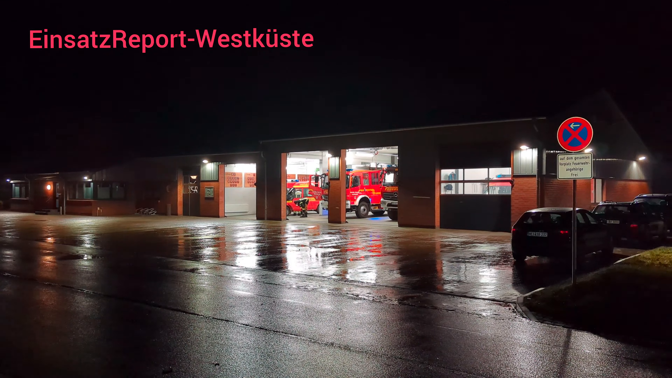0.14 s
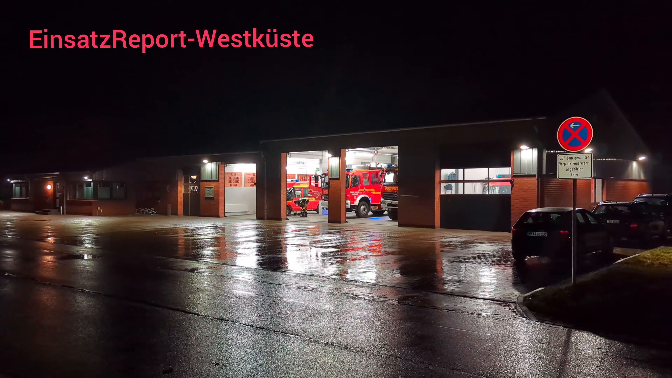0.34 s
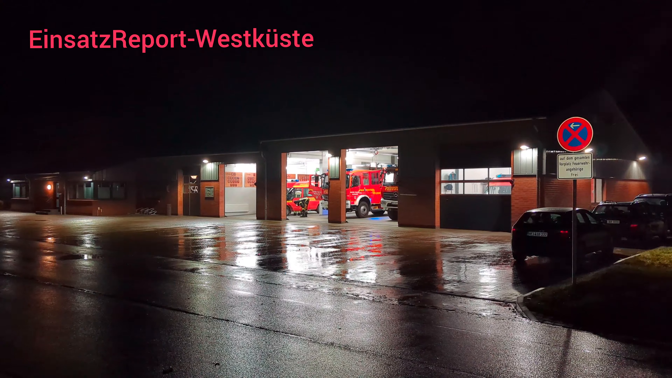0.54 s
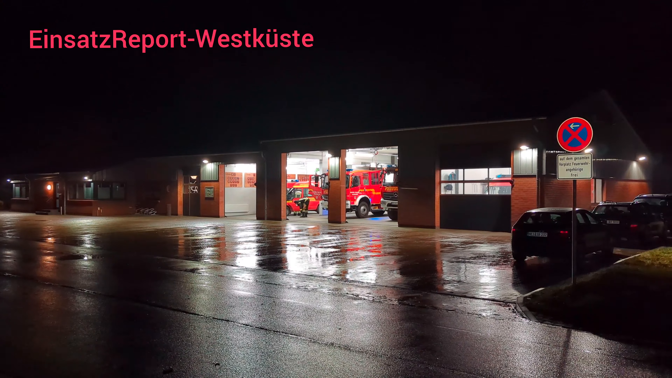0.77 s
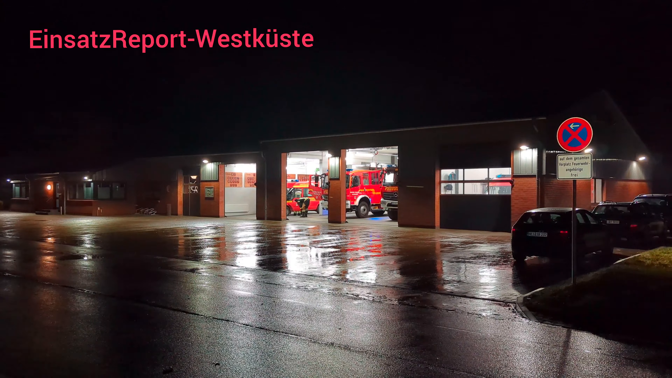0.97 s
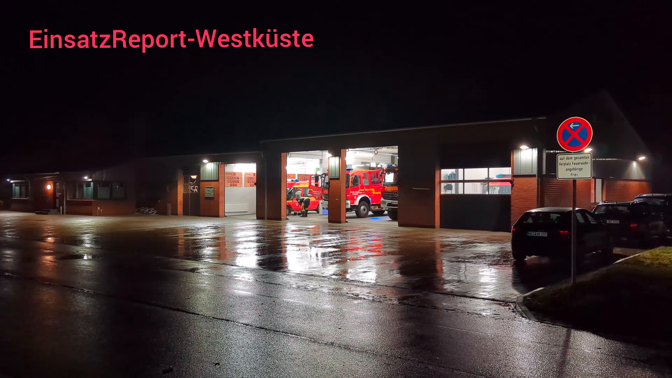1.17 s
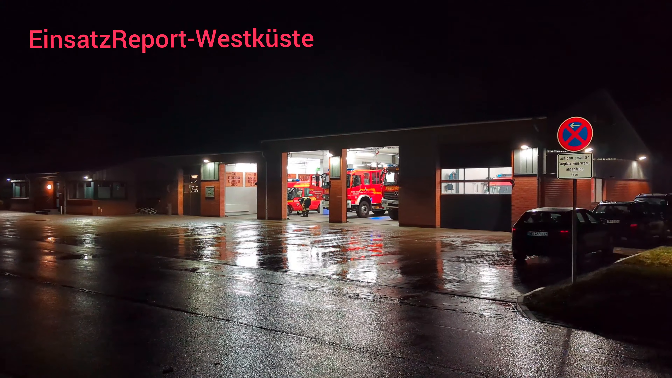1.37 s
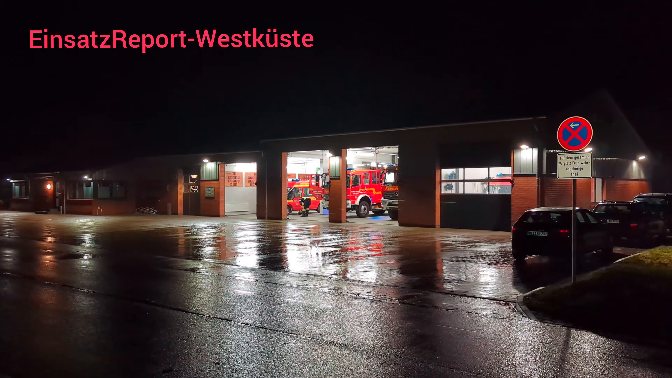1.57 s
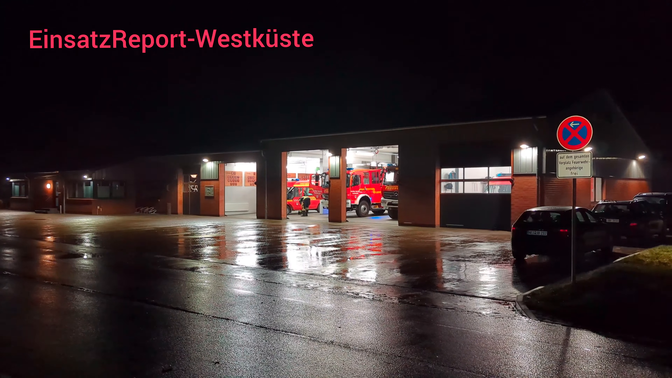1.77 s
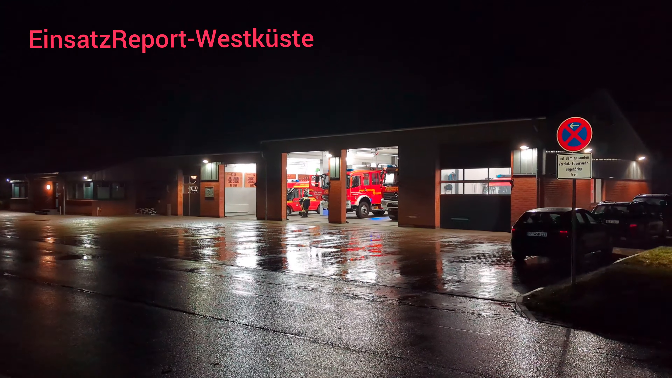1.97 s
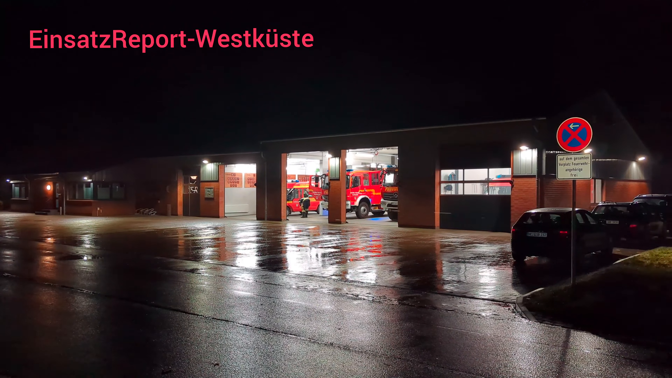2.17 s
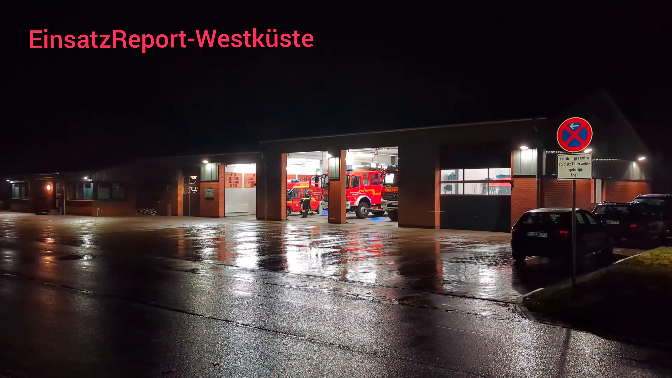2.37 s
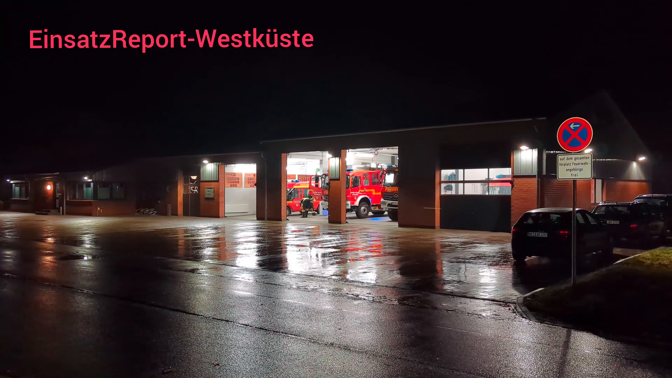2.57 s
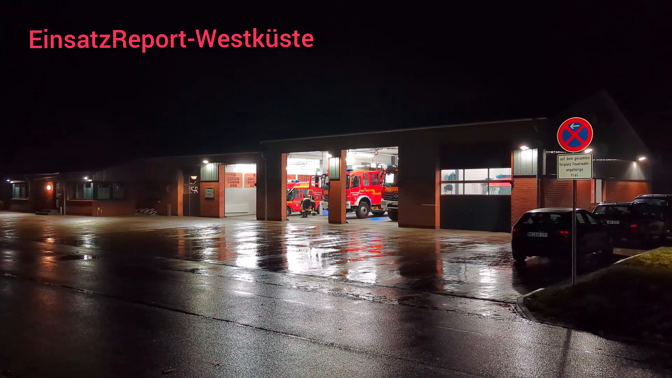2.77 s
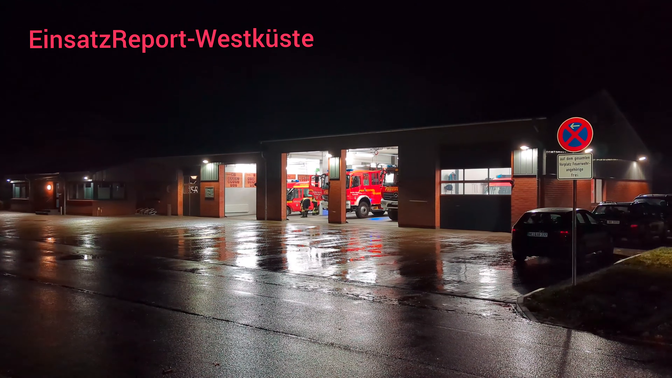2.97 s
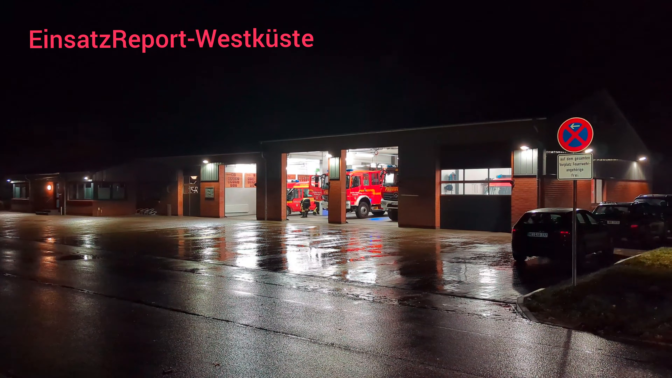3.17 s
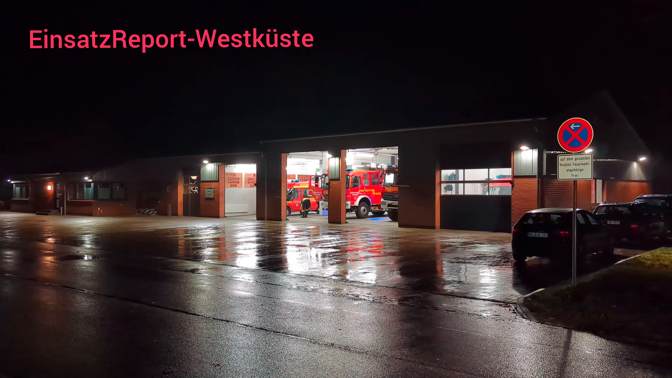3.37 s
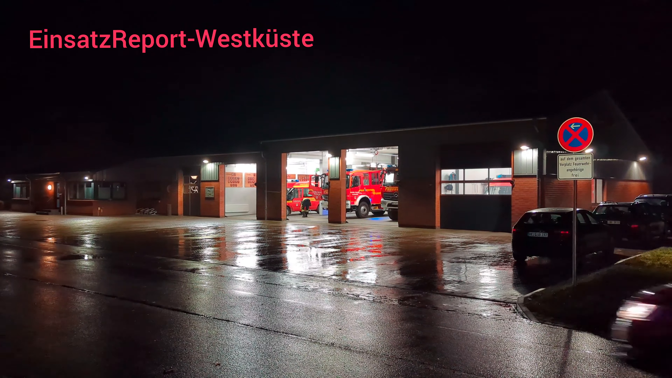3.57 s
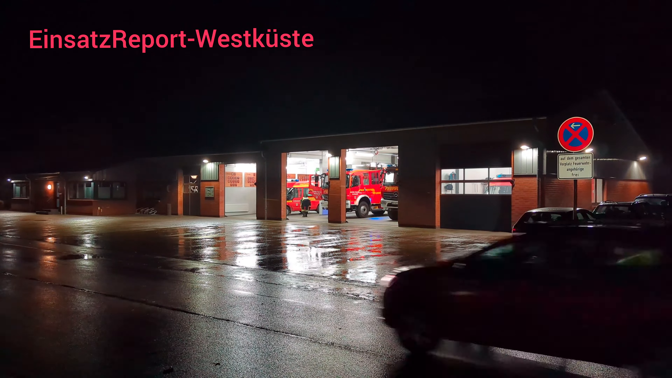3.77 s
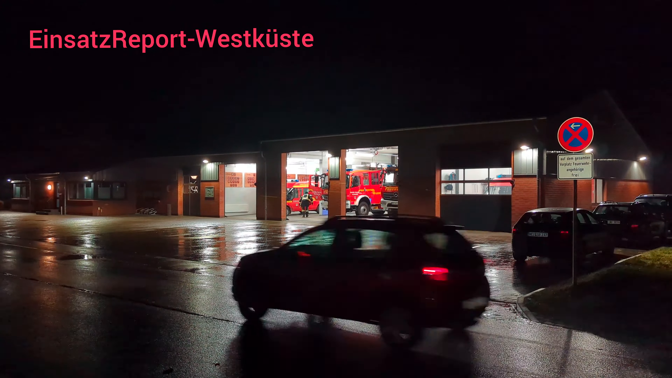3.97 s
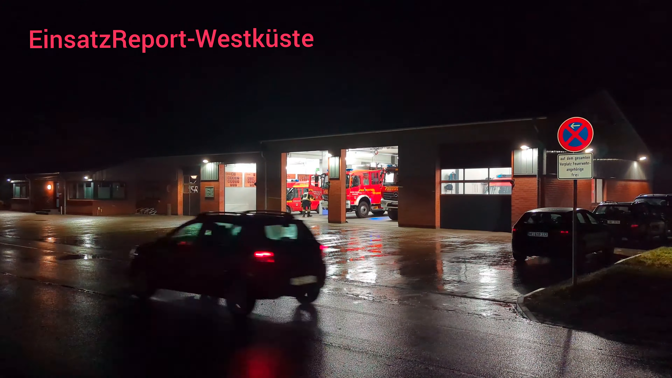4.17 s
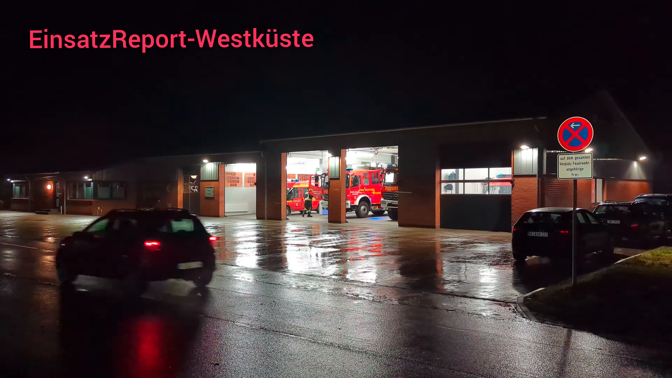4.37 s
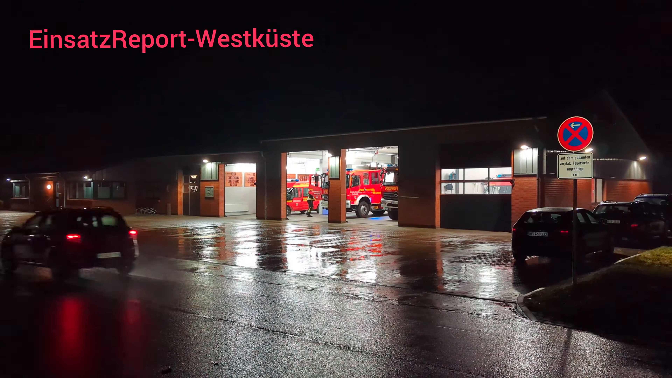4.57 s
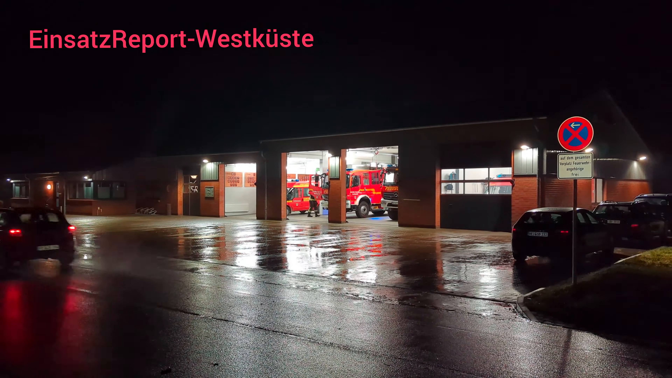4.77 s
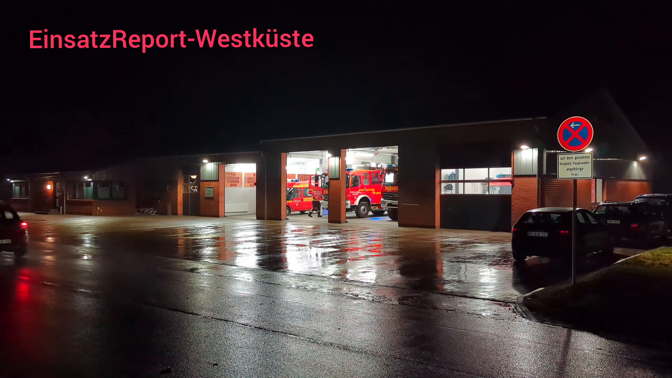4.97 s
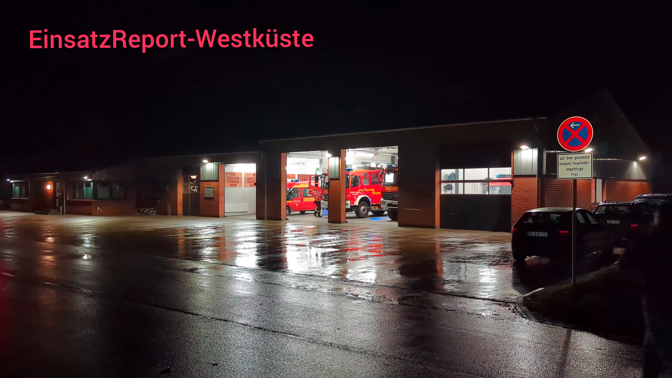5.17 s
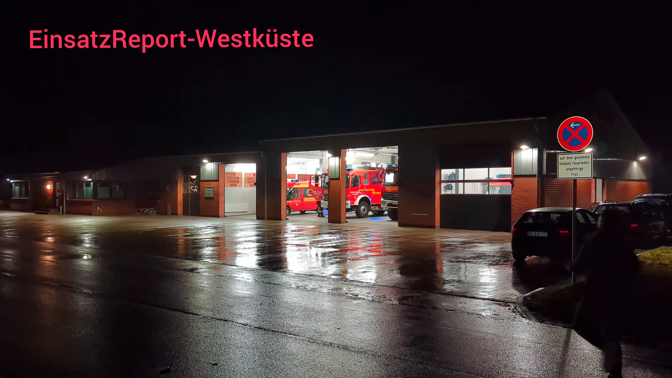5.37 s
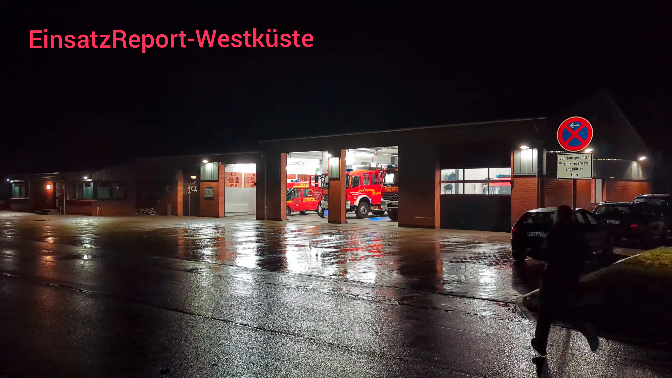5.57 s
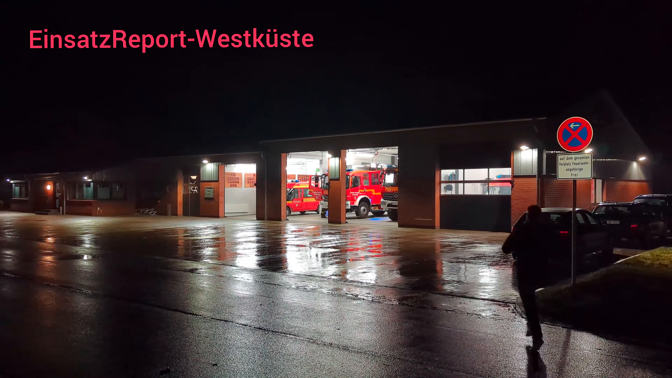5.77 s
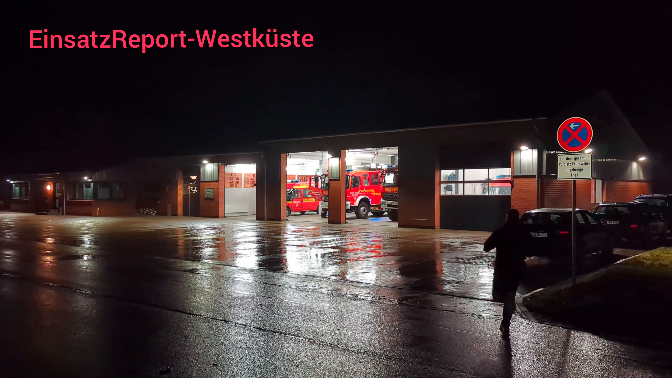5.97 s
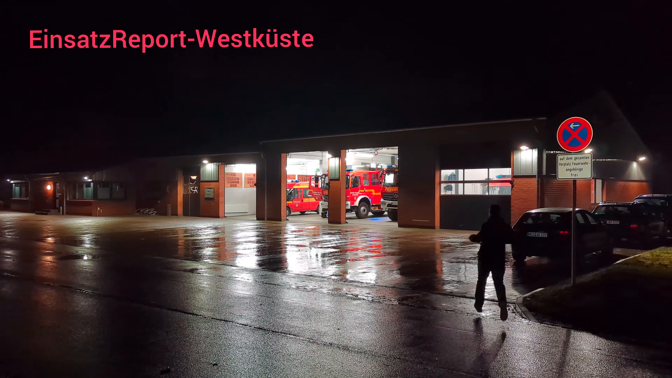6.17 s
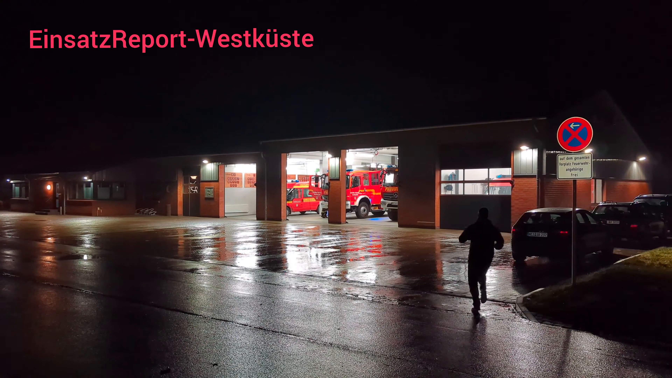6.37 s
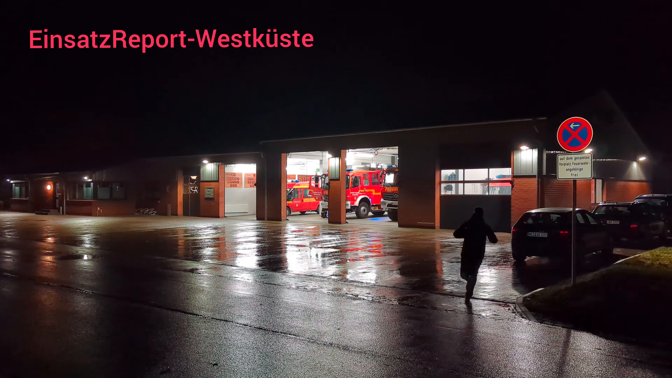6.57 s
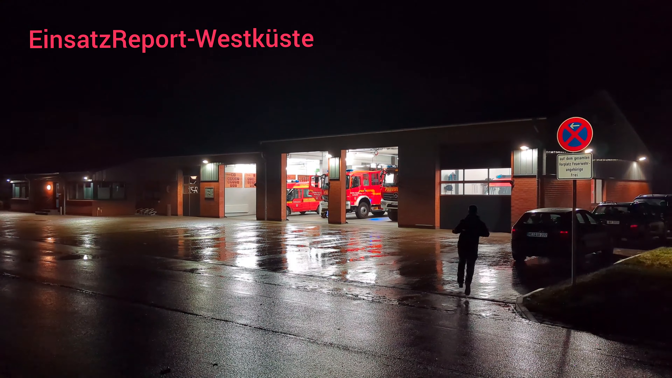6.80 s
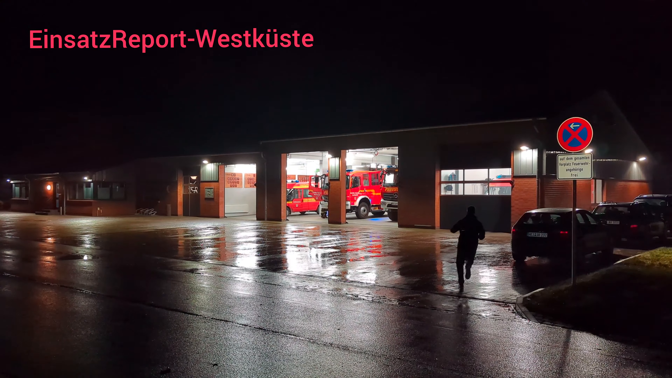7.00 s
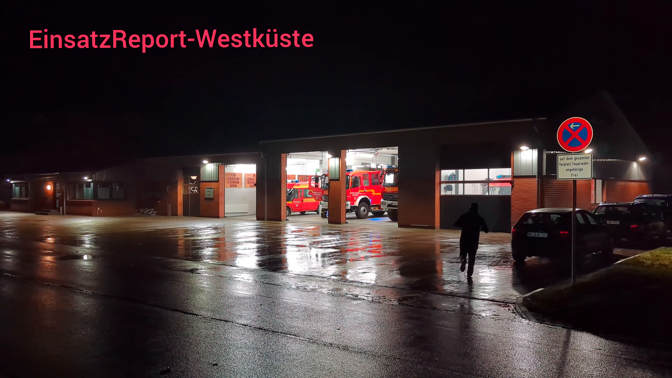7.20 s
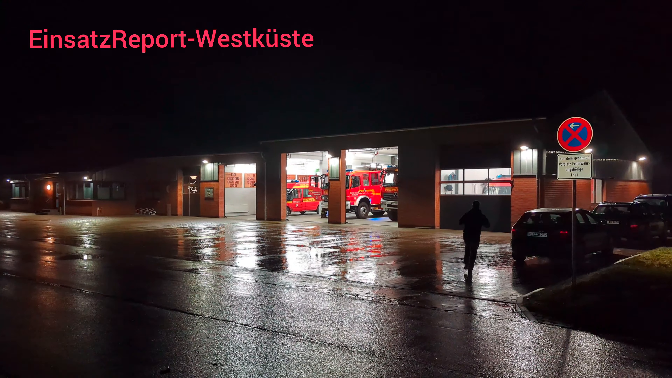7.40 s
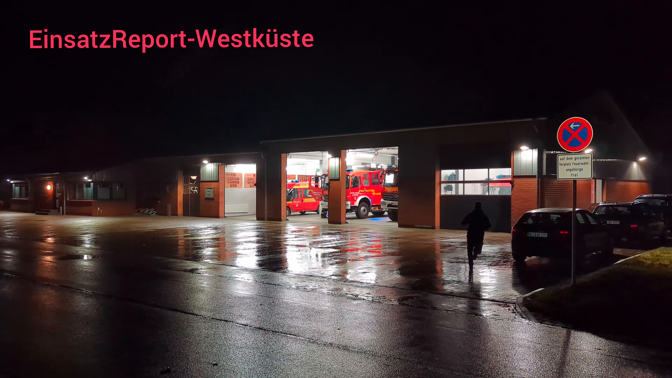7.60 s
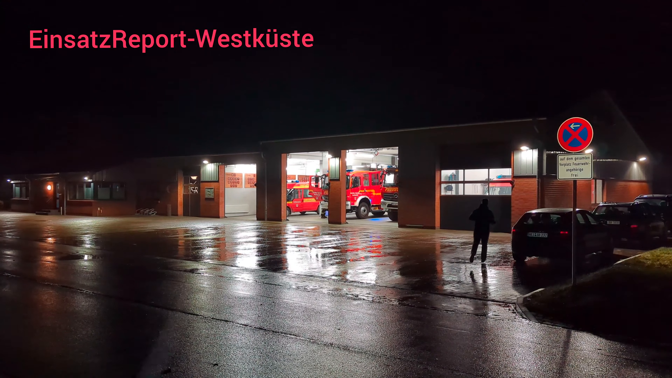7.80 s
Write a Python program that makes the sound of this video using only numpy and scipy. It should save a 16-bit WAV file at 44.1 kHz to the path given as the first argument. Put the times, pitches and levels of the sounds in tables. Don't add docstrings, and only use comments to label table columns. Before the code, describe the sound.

A wet street at night, heard in stereo from the roadside. Very faint drizzle, far traffic and a weak steady building hum form the bed. From 0 s a distant car is a soft watery hiss, with small drip ticks and one barely audible step near 1 s. A puddle briefly brightens the hiss around 1.7 to 1.9 s; it swells steadily, with a sharper tick at 3.1 s and more splashing. At about 3.7 to 4 s the car sweeps close by from right to left: broad bright spray, tyre rumble and a short low exhaust hum around 60 Hz. Spray trails from 4.2 s, slowly thinning and darkening, the engine sinking away by 7 s. Light running steps crunch on wet grit at about 6.35, 6.7, 7.0, 7.3 and 7.65 s, while low wind buffets bump mostly the right microphone, strongest around 7 to 7.2 s.

```python
import sys
import numpy as np
from scipy import signal
from scipy.fft import rfft, irfft, next_fast_len
from scipy.io import wavfile
from scipy.ndimage import map_coordinates

SR = 44100
rng = np.random.default_rng(int(sys.argv[2]) if len(sys.argv) > 2 else 0)


def gain_from_db(level_db):
    decades = np.asarray(level_db, float) / 20
    return 10 ** decades


def to_wav(s):
    ch = np.atleast_2d(s).T
    pcm = np.round(np.clip(ch, -1, 1) * 32767)
    wavfile.write(sys.argv[1], SR, pcm.astype(np.int16))


N = 345920
SIZE = next_fast_len(N, real=True)
HZ = np.maximum(np.fft.rfftfreq(SIZE, 1 / SR), 1)
TIME = np.arange(N) / SR

# [f/Hz, level/dB per Hz]
RUMBLE_COLOUR = [(22, -45), (40, -2), (65, 2), (110, -4), (180, -0.5), (250, 0), (310, -5.5), (370, -13.5),
                 (450, -49)]
ROLL_COLOUR = [(280, -70), (370, -12), (430, -2.5), (500, 1), (590, -2.5), (700, -3), (820, -13), (950, -4),
               (1200, -59)]
HISS_COLOUR = [(600, -15), (820, -8), (1000, -4.5), (1300, -1), (1700, -4), (2000, -6), (2500, -12),
               (3200, -22.5), (4200, -48.5)]
SPRAY_COLOUR = [(1600, -32), (2300, -1.5), (3000, -1), (4000, -4), (5500, -10.5), (7000, -20.5),
                (9500, -42.5)]
MIST_COLOUR = [(4000, -25), (6000, -1), (8000, -2), (10000, -8.5), (12000, -19)]
FINEST_MIST_COLOUR = [(8000, -45), (10500, 3), (12000, 4), (14000, -3.5), (16000, 3)]
# [t/s, level/dB]
FILM = [(0, -1), (.6, -1), (1.2, 0), (1.8, 1), (2.4, .5), (2.9, 1), (3.45, 0.5), (3.85, 0.5), (4.2, 1),
        (4.45, -0.5), (4.65, -2), (5.0, 0), (5.3, 2), (5.7, 0.5), (6.42, 1.5), (6.6, -2), (7.3, -3.5),
        (7.84, -7)]
# [t/s, length/s, extra water level/dB]
PUDDLES = [
    (1.744, 0.13, 8.5),
    (1.877, 0.062, 5),
    (3.05, 0.12, 2),
    (3.326, 0.14, 2.5),
    (4.174, .1, 1),
    (4.317, 0.099, 2.5),
    (6.1, 0.066, 2.5),
    (6.417, 0.076, 2),
]
# [t/s, level/dB]
TYRE_CAVITY = [(0, -51), (1.3, -53), (1.8, -44.5), (2.5, -40), (2.95, -41), (3.3, -46), (3.9, -56),
               (4.4, -39), (5.9, -45), (7.84, -61.5)]
# [t/s, f/Hz, level/dB]
ROAD_HUMP = [(0, 430, -73.5), (2.6, 430, -52), (3.0, 390, -39.5), (3.3, 330, -43.5), (3.6, 270, -33.5),
             (3.9, 230, -36), (4.2, 215, -38), (4.6, 210, -47.5), (7.84, 210, -55.5)]
# [t/s, level/dB]
EXHAUST = [(0, -50), (1.05, -52.5), (1.65, -49), (2.36, -45), (2.67, -59), (2.86, -40.5), (3.3, -37.5),
           (3.65, -32.5), (3.86, -22.5), (4.11, -23.5), (4.33, -31.5), (5.0, -37), (5.13, -46), (5.45, -38),
           (5.65, -45), (5.8, -40.5), (6.5, -48), (7.0, -40)]
# [t/s, level/dB]
SECOND_ORDER = [(0, -65), (2.9, -56), (3.2, -44), (3.47, -36.5), (3.62, -42.5), (3.86, -32), (4.15, -43),
                (4.6, -49), (7.0, -57)]
# [f/Hz, level/dB]
SCATTER = [(60, -26), (300, -15), (1000, -12), (2500, -5.5), (4500, -2), (7000, 1), (11000, 6), (16000, 8)]
# [bearing/deg, left echo 0-1, right echo 0-1,
# treble left-right level/dB, scattered level/dB]
HOUSING = [(-84, 0.36, .04, 8, 5), (-79, 0.15, 0.02, -1.5, -2.5), (-56, 0.02, .02, -6.5, -2.5),
           (-43, 0.2, 0, -6, 0.5), (-10, 0.4, 0.6, -5, 4.5), (13, 0.77, 0.65, -1, 5.5),
           (55, 0.27, 0.34, 1.5, 4), (69.5, 0.13, 0.9, 9.5, 3), (73.5, 0.26, 0.4, 1.8, 2.1),
           (81.5, 0, 0.54, 4, 3.5)]
# [f/Hz, level/dB]
LEFT_ECHO = [(500, -20), (1500, -21), (2500, 2), (6000, 4.5), (9000, -28), (16000, -14)]
RIGHT_ECHO = [(500, -14), (1500, -16), (2500, 0.5), (6000, -8), (10000, 5), (16000, -27)]
# [t/s, peak level/dB, left-right level/dB]
STEPS = [
    (0.9994, -53, 0.5),
    (6.3494, -42, -2),
    (6.678, -46, 0.5),
    (6.9815, -47.5, 0.5),
    (6.999, -41, 0.5),
    (7.32, -42, 0.0),
    (7.335, -50, 10.5),
    (7.65, -45, 0.5),
    (7.658, -43, 2),
]
# [t/s, peak
# level/dB, left-right level/dB]
TICKS = [(0.3094, -48, 3.5), (0.3267, -40, 5), (0.331, -40, 3), (0.5222, -48, -2.0), (0.6569, -44, 2.0),
         (1.3179, -40, 3.0), (1.4994, -41, -1.0), (3.069, -26, -6), (6.4494, -48, 0.5), (6.643, -46, 4.5),
         (6.704, -46, 1.5), (6.761, -40, 0.5), (7.405, -49, 0.5), (7.7244, -47, -5)]
# [f/Hz, level/dB per Hz]
GRIT_COLOUR = [(2000, -25), (4500, 4), (7000, -2), (9500, -2), (11500, -4), (13000, -6), (16000, -9)]
# [t/s, half length/s, level/dB, port 0 left 1 right]
GUSTS = [(0.965, 0.074, -49, 0), (1.38, .05, -58, 0), (1.72, 0.088, -43, 0), (2.051, 0.088, -56, 0),
         (2.622, 0.073, -49, 0), (3.42, .1, -39.5, 0), (4.093, 0.094, -32, 0), (5.224, 0.071, -35, 1),
         (5.38, 0.057, -46, 0), (6.21, 0.044, -34, 1), (6.347, 0.038, -39, 1), (6.548, 0.055, -51, 1),
         (6.907, 0.13, -33.5, 1), (6.998, 0.027, -24.5, 1), (7.06, 0.022, -32, 1), (6.947, 0.033, -37, 1),
         (7.13, 0.034, -31, 1), (7.2, 0.034, -24.5, 1), (7.298, 0.075, -40, 1), (7.38, 0.12, -38, 0),
         (7.617, 0.049, -42.5, 1), (7.749, 0.027, -31.5, 1)]
# [f/Hz, level/dB per Hz]
WIND_COLOUR = [(22, -45), (40, 9.5), (65, 9), (110, 1), (180, -7), (300, -50.5)]
DRIZZLE_COLOUR = [(2500, -25), (5000, -1), (8000, 2), (11000, -9), (16000, -14)]
TOWN_COLOUR = [(200, -30), (450, 4), (800, -1), (1500, -6), (2500, -29.5)]

# (level/dB when closest, share of the spreading loss, extra dB sideways,
# extra dB to the rear, share of the film)
ROLL, HISS = (-35.5, 0.8, 2.5, -0.06, 0.17), (-27, 0.9878, -5, -0.1, 0.97)
SPRAY, MIST = (-33, 1.09, -3, 1.87, 1.07), (-41, 1.58, -5, 1.5, 1.93)
BODY = (-36.5, 0.76, -1.5, -0.9, -0.3)
TREAD_REAR, TREAD_REAR_HZ = (-38, 1.01, -16, 11, 1.8), 2111
TREAD_FRONT, TREAD_FRONT_HZ = (-43.5, 1.3, 5, -7.5, 1), 720

SPEED_OVER_GAP = 2.0
FRONT_LEVEL_S, MIST_LEVEL_S, WHEELS_LEVEL_S = 3.76, 3.73, 3.88
SPRAY_LEVEL_S, SPRAY_SWEEP = 3.7, .83
PUDDLE_EDGE_S = 0.051
FINEST_REAR_DB = -3.5
CAVITY_HZ = 239.3
FIRING_HZ, DOPPLER_HZ, SAG_FROM_S, SAG_HZ_PER_S = 61.16, 0.302, 6.15, 21.2
PAIR_TURN_DEG, PAIR_MS, PAN_DB = 32, .5, 1.1
SHORT_WAY_MS = .6
BEND_HZ, OVER_HZ = 2450, 4500
CREEP_MS, CREEP_FROM_DEG, CREEP_TO_DEG, BASS_CREEP = .285, 62, 74, .05
ECHO_TURNS = .05, .19
# (ahead/ms, change per ms of lag, least/ms, most/ms)
LEFT_ECHO_MS, RIGHT_ECHO_MS = (.41, .28, .28, .455), (.31, -.25, .26, .38)
STEP_DECAY_S, TICK_DECAY_S = 0.011, .0025
STATION_HZ, STATION_DB = 295.5, -54.5
DRIZZLE_DB, TOWN_DB = -67, -65.5
BASS_CUT_HZ, TOP_CUT_HZ = 38, 15950


def tyres():
    roll_db, hiss_db, spray_db = [heard_db(source) for source in (ROLL, HISS, SPRAY)]
    splash_db = splashes()
    spray_db = spray_db + 0.6 * splash_db
    mist_db = heard_db(MIST, MIST_LEVEL_S) + splash_db
    film = 0.56 * drift(4.0) + 0.56 * drift(33)
    finest_db = mist_db - 3 + .35 * (mist_db + 40)
    finest_db = finest_db + FINEST_REAR_DB * np.sin(bearing(MIST_LEVEL_S)) + 4.0
    fine, coarse = droplets(2.4), droplets(4.25)
    roll = layer(coarse, ROLL_COLOUR, roll_db + .5 * drift(2.4))
    hiss = layer(fine, HISS_COLOUR, hiss_db + 4.0 + 0.57 * drift(4.3))
    spray = layer(coarse, SPRAY_COLOUR, spray_db + film)
    mist = layer(fine, MIST_COLOUR, mist_db + 0.67 + 1.7 * film)
    finest = layer(coarse, FINEST_MIST_COLOUR, finest_db + 1.4 * film)
    return roll + hiss + spray + mist + finest


def splashes():
    total_db = np.zeros(N)
    for s, length, db in PUDDLES:
        inside_s = np.minimum(TIME - s, s + length - TIME)
        total_db += db * np.clip(inside_s / PUDDLE_EDGE_S + .5, 0, 1)
    return total_db


def tread():
    rear = wavering(np.full(N, TREAD_REAR_HZ), heard_db(TREAD_REAR), width_hz=240)
    front = wavering(np.full(N, TREAD_FRONT_HZ), heard_db(TREAD_FRONT), width_hz=86)
    return rear + front


def rumble():
    paths = layer(rng.standard_normal((3, N)), RUMBLE_COLOUR, heard_db(BODY) + 1.9 + 0.18 * drift(11))
    cavity_db, = in_time(TYRE_CAVITY)
    paths[0] += wavering(np.full(N, CAVITY_HZ), cavity_db - 2.5, width_hz=10.2)
    paths[0] += wavering(*in_time(ROAD_HUMP), width_hz=34)
    return paths


def exhaust():
    first_db, = in_time(EXHAUST)
    second_db, = in_time(SECOND_ORDER)
    hz = FIRING_HZ - DOPPLER_HZ * np.sin(bearing(WHEELS_LEVEL_S))
    hz -= SAG_HZ_PER_S * np.maximum(TIME - SAG_FROM_S, 0)
    far = np.clip((-36.5 - first_db) / 12, 0, 1)
    phase = 2 * np.pi * np.cumsum(hz + 4.03 * far * drift(10.1)) / SR
    first = gain_from_db(first_db + 0.57 * drift(9.5)) * np.sin(phase)
    second = gain_from_db(second_db + 0.79 * drift(18)) * np.sin(2 * phase)
    third = gain_from_db(second_db - 7 + 1.4 * drift(2.1)) * np.sin(3 * phase)
    fade = np.clip((6.98 - TIME) / 0.2, 0, 1) * gain_from_db(far * 2.0 * drift(6.8))
    return np.sqrt(2) * fade * (first + second + third)


def footsteps():
    return grit_bursts(STEPS, STEP_DECAY_S)


def short_ticks():
    return grit_bursts(TICKS, TICK_DECAY_S)


def grit_bursts(events, decay_s):
    shape, age = np.zeros((2, N)), TIME[:SR // 10]
    burst = (1 - np.exp(-age / (.2 * decay_s))) * np.exp(-age / decay_s)
    for s, db, pan_db in events:
        at = round(s * SR)
        gain = gain_from_db(db - 4.5 + np.array([[pan_db], [-pan_db]]) / 2)
        shape[:, at:at + len(age)] += gain * burst[:N - at]
    return shape * rms_one(coloured(rng.standard_normal((2, N)), response(GRIT_COLOUR)))


def wind():
    shape = np.full((2, N), gain_from_db(-60.0))
    for s, half, db, side in GUSTS:
        shape[round(side)] += gain_from_db(db) * np.exp(-((TIME - s) / half) ** 2)
    lumps = gain_from_db(2.5 * np.array([drift(18), drift(18)]))
    return shape * rms_one(lumps * coloured(rng.standard_normal((2, N)), response(WIND_COLOUR)))


def station_hum():
    return gain_from_db(STATION_DB + 2.7 * drift(1.9)) * np.sin(2 * np.pi * STATION_HZ * TIME)


def night():
    drizzle = rms_one(coloured(rng.standard_normal((2, N)), response(DRIZZLE_COLOUR)))
    town = rms_one(coloured(rng.standard_normal((2, N)), response(TOWN_COLOUR)))
    return gain_from_db(DRIZZLE_DB) * drizzle + gain_from_db(TOWN_DB) * town


def microphones(paths):
    angle = bearing(FRONT_LEVEL_S)
    degrees, *columns = np.transpose(HOUSING)
    left_share, right_share, tilt_db, wet_db = [np.interp(np.degrees(angle), degrees, c) for c in columns]
    lag = pair_lag(angle)
    left_ms, right_ms = [np.clip(ms + slope * lag, least, most)
                         for ms, slope, least, most in (LEFT_ECHO_MS, RIGHT_ECHO_MS)]
    scatter = response(SCATTER)
    share = 1 / np.sqrt(1 + scatter ** 2)
    direct = coloured(paths[0], share)
    wet = gain_from_db(wet_db) * coloured(paths[1:], scatter * share)
    left = port(left_arrival(direct, angle) + wet[0], LEFT_ECHO, ECHO_TURNS[0], left_ms, left_share, tilt_db / 2)
    right = port(direct + wet[1], RIGHT_ECHO, ECHO_TURNS[1], right_ms, right_share, -tilt_db / 2)
    return np.array([left, right]) * gain_from_db([[PAN_DB / 2], [-PAN_DB / 2]])


def left_arrival(direct, angle):
    behind = np.clip((np.degrees(angle) - CREEP_FROM_DEG) / (CREEP_TO_DEG - CREEP_FROM_DEG), 0, 1)
    treble_ms = pair_lag(bearing(SPRAY_LEVEL_S, SPRAY_SWEEP))
    treble_ms = np.where(treble_ms > 0, treble_ms, SHORT_WAY_MS * np.tanh(treble_ms / SHORT_WAY_MS))
    low, below_top = coloured(direct, 1 / (1 + (HZ / np.array([[BEND_HZ], [OVER_HZ]])) ** 12))
    creeping = behind * (below_top - low)
    bass = delayed(low, pair_lag(angle) * (1 + BASS_CREEP * behind))
    treble = delayed(direct - low - creeping, treble_ms)
    return bass + treble + delayed(creeping, treble_ms - CREEP_MS)


def pair_lag(angle):
    return PAIR_MS * np.sin(np.minimum(np.radians(PAIR_TURN_DEG) - angle, np.pi / 2))


def port(x, echo, turns, echo_ms, share, tilt_db):
    bent = coloured(x, response(echo) * np.exp(-2j * np.pi * turns))
    x = x - share * delayed(bent, echo_ms, order=1)
    top = signal.sosfilt(signal.butter(1, 5000, "high", fs=SR, output="sos"), x)
    return x + (gain_from_db(tilt_db) - 1) * top


def bearing(level_s, sweep=1):
    return np.arctan(sweep * SPEED_OVER_GAP * (TIME - level_s))


def heard_db(source, level_s=WHEELS_LEVEL_S):
    db, spreading, side_db, rear_db, wet = source
    angle = bearing(level_s)
    distance_db = spreading * 20 * np.log10(np.cos(angle))
    direction_db = side_db * np.cos(angle) ** 2 + rear_db * np.sin(angle)
    return db + distance_db + direction_db + wet * in_time(FILM)[0]


def droplets(spread_db):
    size = np.minimum(rng.exponential(1, (3, N)), 5)
    return rng.standard_normal((3, N)) * gain_from_db(spread_db * size)


def layer(source, colour, level_db):
    return rms_one(coloured(source, response(colour))) * gain_from_db(level_db)


def wavering(hz, db, width_hz):
    phase = 2 * np.pi * np.cumsum(hz) / SR
    return gain_from_db(db) * (drift(width_hz) * np.sin(phase) + drift(width_hz) * np.cos(phase))


def drift(rate):
    r = np.exp(-80 * np.pi * rate / SR)
    slow = signal.lfilter([1], [1, -2 * r, r * r], rng.standard_normal(N // 40 + 2002))[2000:]
    return np.interp(np.arange(N) / 40, np.arange(len(slow)), rms_one(slow))


def delayed(x, ms, order=3):
    return map_coordinates(x, [np.arange(N) - ms * SR / 1000], order=order, mode="nearest")


def rms_one(x):
    return x / np.sqrt(np.mean(x ** 2) + 1e-20)


def in_time(rows):
    s, *columns = np.transpose(rows)
    return [np.interp(TIME, s, c) for c in columns]


def response(points):
    hz, db = np.transpose(points)
    return gain_from_db(np.interp(np.log(HZ), np.log(hz), db))


def coloured(x, gain):
    return irfft(rfft(x, SIZE) * gain, SIZE)[..., :N]


def scene():
    car = tyres() + rumble()
    car[0] += tread() + exhaust()
    return microphones(car) + footsteps() + short_ticks() + wind() + station_hum() + night()


def low_pass(x):
    return signal.sosfilt(signal.butter(12, 16020, fs=SR, output="sos"), x)


def record(dry):
    mix = signal.sosfilt(signal.butter(2, BASS_CUT_HZ, "high", fs=SR, output="sos"), dry)
    mix = signal.sosfilt(signal.cheby2(16, 50, TOP_CUT_HZ, fs=SR, output="sos"), mix)
    return low_pass(mix)


dry = scene()
out = record(dry)
to_wav(out)
```